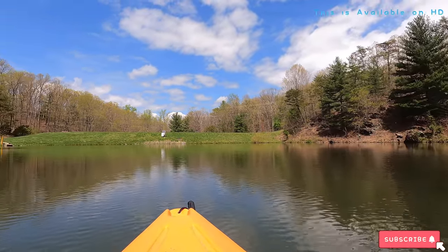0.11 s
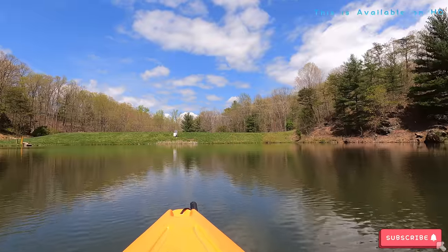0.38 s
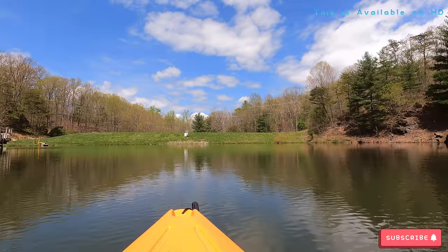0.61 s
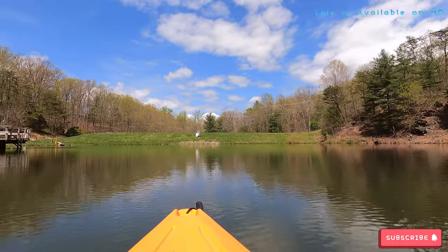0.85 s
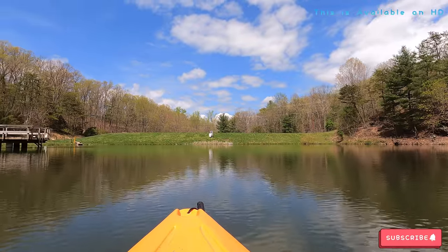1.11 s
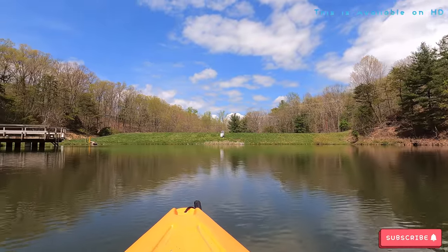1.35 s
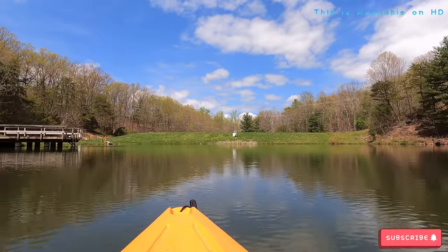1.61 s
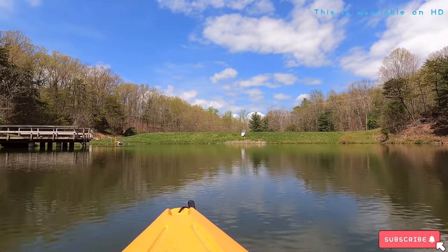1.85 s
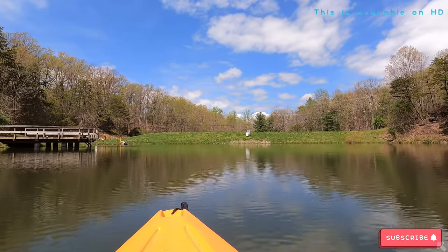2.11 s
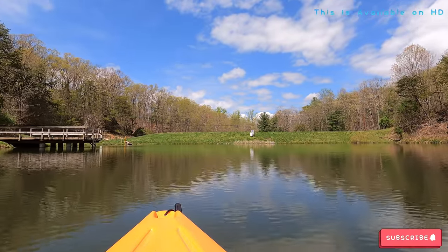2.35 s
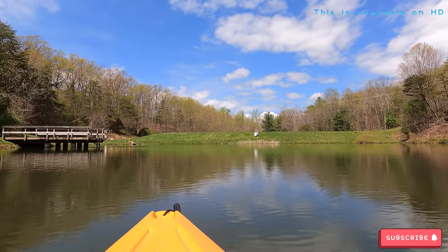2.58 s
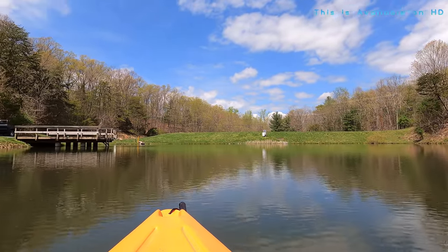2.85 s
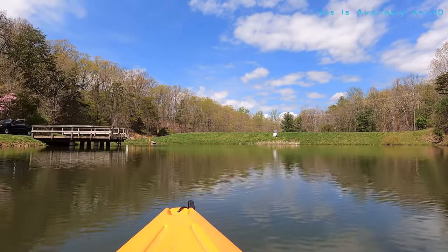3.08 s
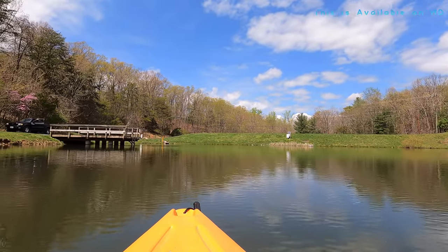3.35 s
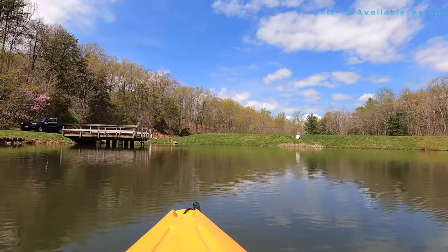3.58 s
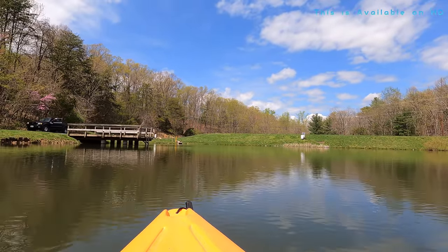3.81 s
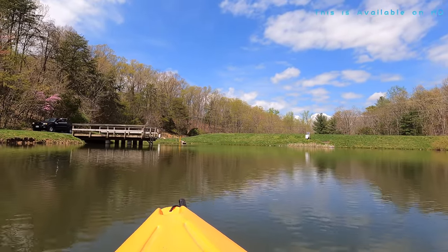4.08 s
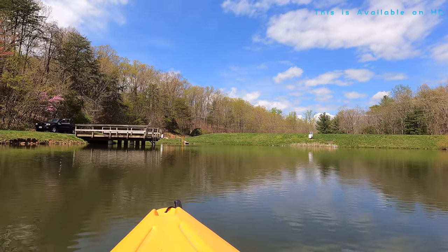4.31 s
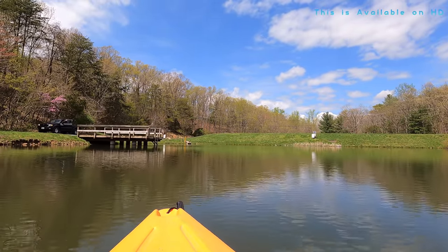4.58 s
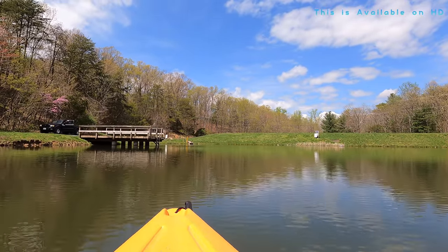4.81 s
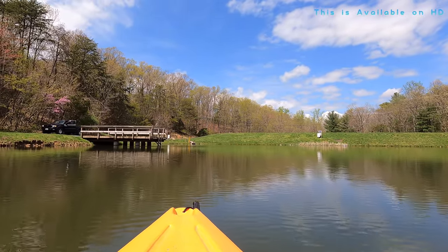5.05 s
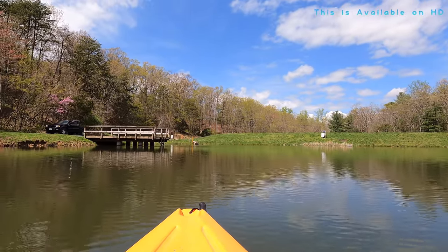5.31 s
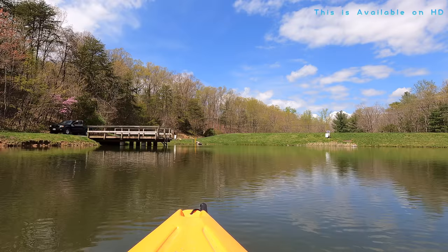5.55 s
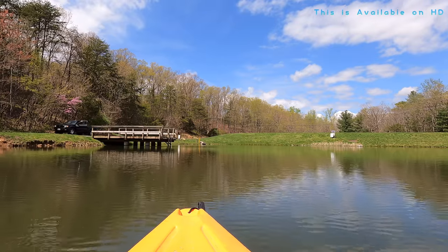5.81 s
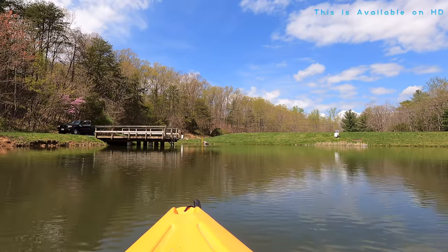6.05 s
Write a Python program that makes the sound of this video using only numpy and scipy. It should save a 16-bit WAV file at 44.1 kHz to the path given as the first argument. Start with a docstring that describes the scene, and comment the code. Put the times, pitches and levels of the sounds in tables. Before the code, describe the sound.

A paddle slaps, plunges and drags through calm lake water beside a kayak, with drips, gurgling bubbles and low buffeting wind.

```python
"""A paddle works beside a kayak on a calm lake, in light wind over the far hush of a shore.
First drips and low wind thumps, then slaps and churning water as the blade plunges and drags;
later the splashing leans left, and further slaps come with a stronger buffet of wind near the end.
Bubbles, thumps and cavities are damped gliding sines, droplets puffs of noise and tone;
wind, spray and shore are shaped stereo noise."""
import sys
import numpy as np
from scipy import signal
from scipy.fft import rfft, irfft, next_fast_len
from scipy.io import wavfile
from scipy.ndimage import map_coordinates

SR = 44100
rng = np.random.default_rng(int(sys.argv[2]) if len(sys.argv) > 2 else 0)


def transcribe(u):
    """Save the signal u as a 16-bit wav file named by the first command-line argument.

    u: samples, shape (n,) or (channels, n), limited to [-1, 1]; the rate is SR.
    q: integer samples, one column per channel.
    """
    v = np.clip(np.atleast_2d(u).T, -1, 1)
    q = np.round(v * 32767).astype(np.int16)
    wavfile.write(sys.argv[1], SR, q)


def magnitude_from_level(level_db):
    """Linear magnitude for a level in decibels (20 dB per decade)."""
    exponent = np.asarray(level_db, float) / 20
    return 10 ** exponent


N = 272097

# stirred water: time_s, gurgle_db, spray_db
STROKE = [(0.0, -47, -74), (0.1, -59, -74), (0.76, -59, -81), (1.29, -56.5, -86), (1.38, -47.5, -79),
          (1.54, -53.5, -81), (1.68, -39.5, -69), (1.95, -48.5, -70.5), (2.14, -46, -67.5),
          (2.45, -52, -75.5), (2.6, -56, -79), (2.83, -44.5, -67.5), (2.97, -51, -69), (3.28, -52.5, -73.5),
          (3.43, -52, -63.5), (3.63, -53, -85.5), (3.7, -38, -66), (3.87, -45, -73), (4.03, -43.5, -66),
          (4.18, -49, -68.5), (4.4, -44, -58), (4.48, -54.5, -83), (4.6, -39, -68), (4.77, -38.5, -62),
          (4.88, -46.5, -77), (4.96, -36, -59.5), (5.12, -41.5, -73), (5.4, -51.5, -68.5), (5.49, -44, -65),
          (5.62, -51.5, -68.5), (5.77, -49, -68), (5.94, -38, -71.5), (6.17, -51.5, -74)]
# drops and slaps on the surface: start_s, level_db, pitch_hz, length_s, left_over_right_db
IMPACTS = [(0.3475, -28, 5760, 0.0015, -2), (0.45, -26, 5080, 0.0018, -4), (1.036, -31, 3030, 0.0029, -1),
           (1.3339, -26.5, 1280, 0.0023, -2), (1.337, -31.5, 600, 0.0055, -1),
           (1.3432, -24.5, 1810, 0.0076, 2), (1.366, -30, 1230, 0.0045, 2), (1.6972, -24, 3480, 0.001, 1),
           (2.674, -40.5, 2980, 0.02, 28), (2.751, -42, 1710, 0.0078, -4), (2.819, -23, 2980, 0.00069, 21),
           (2.913, -39, 1940, 0.011, 6), (3.344, -29.5, 3870, 0.0017, -6), (3.3542, -27, 4360, 0.0013, -6),
           (3.3755, -15, 2880, 0.00043, -6), (3.4076, -30.5, 3870, 0.0029, -4),
           (3.4314, -22.5, 1245, 0.0038, -4), (3.4316, -27.5, 3550, 0.0039, -0.5),
           (3.444, -26, 1785, 0.0045, 1), (3.4536, -22.5, 2120, 0.0042, -6),
           (3.6662, -10.5, 1290, 0.0027, -1.5), (3.6665, -23.5, 3430, 0.0017, -5),
           (4.2054, -26.5, 2650, 0.0024, 0), (4.241, -31, 3420, 0.0061, 20),
           (4.2543, -24, 3140, 0.0034, 19), (4.3471, -24.5, 2000, 0.0016, 20),
           (4.3671, -13, 2830, 0.0011, 16), (4.5508, -20, 1330, 0.0051, 21.5), (4.551, -20, 630, 0.0039, 7),
           (4.5947, -31.5, 5540, 0.0029, 3), (4.6546, -19, 2900, 0.0015, 28),
           (4.6549, -32.5, 3700, 0.0087, 27.5), (4.681, -31.5, 1480, 0.0069, 31),
           (4.7283, -27, 2040, 0.0034, 31), (4.7582, -21, 2050, 0.0029, 32),
           (4.932, -30.5, 2490, 0.0032, 36), (4.9595, -24.5, 1980, 0.004, 30),
           (5.4215, -26, 2200, 0.0041, 15), (5.441, -27, 4860, 0.0014, -19),
           (5.4718, -13.5, 1950, 0.0012, -5.5), (5.474, -19, 990, 0.002, -3),
           (5.4755, -21, 1300, 0.0023, -4), (5.5172, -12.5, 1800, 0.00053, -4),
           (5.5207, -28, 2450, 0.0045, 6.5), (5.675, -18.5, 1330, 0.0025, -5.5),
           (5.6768, -31.5, 1630, 0.012, -5), (5.9154, -25, 445, 0.01, -5)]
# spray spectrum: freq_hz, relative_db
SPRAY_SPECTRUM = [(1200, -38), (2500, 3), (3600, 0.5), (5100, 1.5), (6400, -3), (7600, -5.5), (9800, -15),
                  (12100, -15), (15900, -44)]
# microphone response to the water: freq_hz, gain_db
MIC_RESPONSE = [(200, 3.5), (820, -7), (1150, -4.5), (2200, -3), (4900, 0.5), (6500, -6.5), (9500, -7.5),
                (12000, -8), (16000, -12)]


def unit(x):
    """Scale to rms 1."""
    return x / np.sqrt(np.mean(x ** 2) + 1e-20)


def along(points, hz):
    """Interpolate (Hz, value) points on a log frequency axis."""
    point_hz, value = np.transpose(points)
    return np.interp(np.log(hz + 1), np.log(point_hz + 1), value)


def curves(rows):
    """One value per sample for each column after the time."""
    time_s, *columns = np.transpose(rows)
    return [np.interp(np.arange(N) / SR, time_s, column) for column in columns]


def wobble(knots_per_s):
    """A smooth random curve through normal knots."""
    knots = rng.standard_normal(int(N * knots_per_s / SR) + 4)
    return map_coordinates(knots, [np.arange(N) * knots_per_s / SR])


def filtered(x, response):
    """Apply a complex response, a function of frequency in Hz."""
    size = next_fast_len(N + 8192)
    return irfft(rfft(x, size) * response(np.fft.rfftfreq(size, 1 / SR)), size)[..., :N]


def sides(pan_db):
    """Left and right gains of mean power 1; positive leans left."""
    return np.sqrt(2 / (1 + magnitude_from_level([-2 * pan_db, 2 * pan_db])))


def side(time_s):
    """Left-right dB of the stirred water."""
    # time_s, left_over_right_db
    side_rows = [(0.7, 1), (0.92, -5.5), (1.25, -3), (1.34, 0), (1.9, 0), (2.4, 6), (2.83, 8), (3.12, 5),
                 (3.25, -3.5), (3.87, -1), (4.36, 4), (4.6, 9), (5.27, 14), (5.45, 2.5), (5.75, -1)]
    return np.interp(time_s, *np.transpose(side_rows))


def rush(spectrum, alike, lead=((1, 0),), tilt=((1, 0),)):
    """Stereo noise of rms 1, partly alike and phase-shifted between the ports."""
    def ports(hz):
        turn = np.exp(.5j * along(lead, hz))
        return magnitude_from_level(along(spectrum, hz)) * sides(along(tilt, hz)) * [turn, turn.conj()]

    def share(hz):
        return np.clip(along(alike, hz), 0, 1)

    common, *own = rng.standard_normal((3, N))
    shared = filtered(common, lambda hz: np.sqrt(share(hz)) * ports(hz))
    separate = filtered(np.array(own), lambda hz: np.sqrt(1 - share(hz)) * ports(hz))
    return unit(shared + separate)


def rings(start_s, level_db, hz, end_hz, length_s, pan_db, fade, attack_s):
    """Damped gliding sines; the left port lags more the more a sound lies left, up to a limit."""
    # a rising pitch glides fastest at the end, as the bubble nears the surface; a falling one from the start
    rise_bend, fall_bend = 2.98, 0.933
    out = np.zeros((2, N + SR))
    left_lag_s = np.clip(30e-6 + 9e-6 * pan_db, 0, 180e-6)
    # sounds of similar length are computed together
    size_log2 = np.ceil(np.log2(length_s * SR)).astype(int)
    for k in np.unique(size_log2):
        g = size_log2 == k
        samples = np.arange(2 ** k + 16)
        at = np.round(start_s[g, None] * SR).astype(int) + samples
        bend = np.where(end_hz > hz, rise_bend, fall_bend)[g, None]
        for ch, gain in enumerate(sides(pan_db[g])):
            t = np.maximum(samples / SR - left_lag_s[g, None] * (1 - ch), 0)
            life = np.minimum(t / length_s[g, None], 1)
            turns = t * (hz[g, None] + (end_hz - hz)[g, None] * life ** bend / (bend + 1))
            envelope = (1 - life) ** fade * (1 - np.exp(-t / attack_s))
            wave = envelope * np.sin(2 * np.pi * turns)
            scaled = wave * (gain * magnitude_from_level(level_db[g]))[:, None]
            out[ch] += np.bincount(at.ravel(), scaled.ravel(), N + SR)
    return out[:, :N]


def swarm(mid_hz, octaves, cycles, spread_db, rise, pan_db, stray_db, count):
    """Random small bubbles of rms 1: log-normal pitch, a few much louder than the rest."""
    at = rng.uniform(0, N - 1, count)
    pitch_draw, rise_draw, life_draw, pan_draw = rng.standard_normal((count, 4)).T
    hz = np.clip(mid_hz * 2 ** (octaves * pitch_draw), 300, 15000)
    end_hz = hz * (1 + rise * abs(rise_draw))
    level_db = spread_db * rng.exponential(1, count).clip(0, 4)
    pan = pan_db[at.astype(int)] + stray_db * pan_draw
    length_s = cycles * np.exp(.4 * life_draw.clip(-2, 2)) / hz
    return unit(rings(at / SR, level_db, hz, end_hz, length_s, pan, fade=0.36, attack_s=0.000069))


def churn():
    """Water stirred by the blade: separate gurgling bubbles over a wash of tiny ones and a fizz of spray."""
    (gurgle_db, spray_db), pan_db = curves(STROKE), side(np.arange(N) / SR)
    clump = wobble(45)
    gurgle = swarm(1750, .75, 6, 4.5, .2, pan_db, 4, count=4200)
    wash = swarm(1717, 0.91, 3.23, 3.2, 0.05, pan_db, 10.6, count=9000)
    fizz = swarm(4670, 0.78, 4.3, 3.15, 0.07, pan_db, 8.4, count=6000)
    blips = swarm(1400, .65, 10, 3, .1, pan_db, 4, count=900)
    hiss = rush(SPRAY_SPECTRUM, [(3000, 1.0), (12000, 0.4)]) * sides(pan_db)
    # spray on the open left side reaches the port with its finest treble
    air = rush([(7000, -60), (10500, -15), (12200, -4), (15800, -17)], [(1, .4)], tilt=[(1, 22)])

    stirred = magnitude_from_level(-2) * gurgle + magnitude_from_level(-5.5 + 2.5 * clump) * wash + magnitude_from_level(-4) * blips
    water = magnitude_from_level(gurgle_db) * stirred + magnitude_from_level(spray_db + 8.5 + 5.3 * clump) * fizz
    spray = magnitude_from_level(spray_db + 3.5 + 4.0 * clump) * hiss
    spray = spray + magnitude_from_level(spray_db - 18.5 + 1.28 * pan_db + 4.2 * clump) * air
    return filtered(water, lambda hz: magnitude_from_level(along(MIC_RESPONSE, hz))) + spray


def bubbles_and_thumps():
    """Larger air bubbles ring one by one, unsteadily; the low rows from 0.9 to 1.24 s are thumps of wind."""
    # start_s, level_db, start_hz, end_hz, length_s
    ring_rows = [(0.008, -37.5, 1054, 1730, 0.028), (0.916, -26, 270, 554, 0.012),
                 (1.024, -26, 334, 407, 0.0085), (1.07, -32, 462, 450, 0.022),
                 (1.161, -35, 300, 383, 0.012), (1.198, -37, 260, 330, 0.014),
                 (1.235, -33, 326, 420, 0.011), (1.379, -36.5, 678, 660, 0.026),
                 (1.409, -42.5, 624, 524, 0.028), (1.469, -41, 1106, 900, 0.026),
                 (1.639, -37.5, 1015, 1300, 0.028), (1.689, -34.5, 1036, 1170, 0.019),
                 (1.755, -38, 1110, 1250, 0.016), (1.802, -37, 1500, 1550, 0.014),
                 (1.83, -40, 910, 910, 0.038), (1.872, -43.5, 830, 1020, 0.039),
                 (1.972, -34.5, 1210, 3860, 0.013), (2.114, -39, 581, 680, 0.03),
                 (2.193, -33, 465, 520, 0.029), (2.385, -36, 490, 473, 0.0084),
                 (2.446, -32.5, 617, 546, 0.014), (2.447, -30.5, 960, 1640, 0.027),
                 (3.044, -36.5, 2170, 4750, 0.013), (3.114, -42.5, 954, 660, 0.026),
                 (3.6705, -25, 1150, 1030, 0.014), (3.672, -41, 756, 438, 0.037),
                 (3.699, -30.5, 514, 1310, 0.032), (3.738, -41, 583, 640, 0.03),
                 (3.7626, -32, 1310, 1600, 0.0092), (3.766, -37.5, 798, 1500, 0.027),
                 (3.981, -38.5, 952, 2100, 0.04), (4.346, -39.5, 728, 1370, 0.036),
                 (4.556, -28.5, 715, 248, 0.039), (4.592, -34, 335, 460, 0.025),
                 (4.778, -33, 1048, 1710, 0.032), (5.0406, -33.5, 2190, 2680, 0.021),
                 (5.5144, -31, 1050, 850, 0.017), (5.676, -32.5, 670, 640, 0.02),
                 (5.694, -24.5, 1210, 860, 0.016), (5.711, -30, 940, 670, 0.018),
                 (5.9205, -30, 1590, 1590, 0.012)]
    quaver_db, quavers_per_s = 1.5, 130  # the water around shakes the bubbles
    columns = np.transpose(ring_rows)
    ring = rings(*columns, side(columns[0]), fade=0.68, attack_s=0.00014)
    return ring * magnitude_from_level(quaver_db * wobble(quavers_per_s))


def impacts():
    """Each drop or slap opens a cavity ringing in a few sagging modes; so small a source radiates little bass."""
    # cavity modes: pitch_ratio, level_db
    cavity_modes = [(1.002, 1), (1.5, -19.5), (2.6, -26.5)]
    end_over_start_pitch, bass_cut_hz = 0.89, 350
    start_s, level_db, hz, length_s, pan_db = np.transpose(IMPACTS)
    ring = 0
    for ratio, mode_db in cavity_modes:
        mode_hz = ratio * hz
        ring = ring + rings(start_s, level_db + mode_db, mode_hz, mode_hz * end_over_start_pitch,
                            length_s, pan_db, fade=0.55, attack_s=0.0001)
    return filtered(ring, lambda hz: (1j * hz / (bass_cut_hz + 1j * hz)) ** 2)


def splash():
    """Every impact throws a ragged burst of tiny bubbles that dies within a few hundredths of a second."""
    decay_60db_s = 0.068
    start_s, level_db, _, length_s, pan_db = np.transpose(IMPACTS)
    # powers add, then the root gives the envelope
    power = np.bincount(np.round(start_s * SR).astype(int), magnitude_from_level(2 * level_db) * length_s / .003, N)
    power_decay = magnitude_from_level(-2 * 60 * np.arange(SR // 5) / SR / decay_60db_s)
    throw = np.sqrt(np.abs(signal.fftconvolve(power, power_decay)[:N]))
    pan_curve_db = np.interp(np.arange(N) / SR, start_s, pan_db)
    spatter = swarm(1740, 0.866, 7.4, 0.88, .2, pan_curve_db, 4.7, count=9000)
    return magnitude_from_level(-15) * throw * filtered(spatter, lambda hz: magnitude_from_level(along(MIC_RESPONSE, hz)))


def ticks():
    """Droplets burst as short puffs of noise and tone; many faint ones fall at random in the spray."""
    # start_s, level_db, pitch_hz
    tick_rows = [(0.2036, -35, 5330), (0.397, -40.5, 5900), (1.3798, -41.5, 6800), (1.456, -40, 4740),
                 (1.6332, -33.5, 5560), (2.15, -38, 5170), (2.2, -36, 4630), (2.2577, -41, 6940),
                 (2.526, -40, 5000), (3.095, -35.5, 7500), (3.213, -37, 4270), (3.3592, -28, 4720),
                 (3.495, -38, 4600), (3.704, -32, 4500), (3.743, -35, 4860), (3.807, -39.5, 4440),
                 (4.0587, -35.5, 4750), (4.285, -37, 6520), (4.375, -27.5, 7400), (4.4136, -33.5, 4370),
                 (5.3394, -35.5, 8100), (5.442, -30, 4920), (5.4652, -28.5, 4700), (5.522, -31, 5100),
                 (5.737, -34.5, 6340)]
    faint_count, puff_samples, decay_60db_s, bass_cut_hz = 450, 256, 0.014, 3000
    _, spray_db = curves(STROKE)
    when, loudness, pitch, stray = rng.uniform(0, 1, (faint_count, 4)).T
    k = (when * (N - 1)).astype(int)
    faint_db = spray_db[k] + 14 - 5 * np.log(1 - .97 * loudness)
    faint = [k / SR, faint_db, 4000 * 2 ** (1.77 * pitch), 10 * (stray - .5)]
    listed = np.pad(np.transpose(tick_rows), ((0, 1), (0, 0)))  # no stray pan
    start_s, level_db, hz, stray_db = np.hstack([listed, faint])
    pan_db = side(start_s) + stray_db

    t = np.arange(puff_samples) / SR
    noise = rng.standard_normal((len(start_s), 3, puff_samples))
    # each port hears a slightly different burst
    noise = 0.9 * noise[:, 0] + 0.96 * noise[:, 1:].transpose(1, 0, 2)
    tone = 1.03 * np.sin(2 * np.pi * hz[:, None] * t)
    puffs = (noise + tone) * magnitude_from_level(-60 * t / decay_60db_s)
    at = np.round(start_s * SR).astype(int)[:, None] + np.arange(puff_samples)
    out = []
    for puff, gain in zip(puffs, sides(pan_db)):
        scaled = puff * (gain * magnitude_from_level(level_db))[:, None]
        out.append(np.bincount(at.ravel(), scaled.ravel(), N + puff_samples))

    def response(hz):
        return magnitude_from_level(along(SPRAY_SPECTRUM, hz)) * (1j * hz / (bass_cut_hz + 1j * hz)) ** 2
    return filtered(np.array(out), response)


def wind():
    """Slow buffeting differs from port to port; the flutter and rattle above it come in lumps shared by both."""
    # time_s, buffet_db, flutter_db
    wind_rows = [(0.0, -38.5, -49.5), (0.3, -32.5, -48), (0.4, -33.5, -49), (0.76, -35.5, -49),
                 (0.86, -26, -45), (0.99, -27, -37.5), (1.24, -27, -38.5), (1.35, -31.5, -46.5),
                 (1.48, -26, -40), (1.6, -39.5, -49), (1.81, -21, -42.5), (1.93, -33, -51),
                 (2.06, -31.5, -41), (2.26, -23.5, -42.5), (2.42, -41.5, -53), (2.58, -29.5, -38),
                 (2.9, -31, -35), (3.01, -37, -51.5), (3.1, -30.5, -41), (3.24, -38, -48.5),
                 (3.53, -42, -50), (3.96, -33, -53.5), (4.29, -37.5, -57), (4.51, -30.5, -46),
                 (4.62, -33.5, -46.5), (4.89, -31.5, -46.5), (5.08, -28, -35.5), (5.2, -39.5, -43),
                 (5.39, -33.5, -41), (5.78, -30, -39.5), (5.85, -20.5, -37), (5.93, -23, -28.5),
                 (6.17, -27, -41)]
    # spectra: freq_hz, relative_db
    buffet_spectrum = [(12, -25), (24, 7.5), (36, 5), (60, 2.5), (90, -1.5), (130, -10), (200, -38),
                       (500, -120)]
    flutter_spectrum = [(40, -104), (70, -84), (120, -9.5), (170, -0.5), (250, -9), (400, -15.5),
                        (650, -37.5), (1200, -55), (4000, -120)]
    rattle_spectrum = [(200, -60), (330, -4), (480, -3.5), (700, -3.5), (1200, -40), (3000, -120)]
    # likeness of the ports: freq_hz, likeness_0_to_1
    port_likeness = [(35, .38), (65, .5), (100, .45), (160, .9), (250, .95), (500, .8)]
    # freq_hz, left_lead_rad
    port_lead = [(35, .3), (65, .5), (105, .1), (140, -1.45), (400, -1.4), (600, -1.1)]
    # freq_hz, left_over_right_db
    port_tilt = [(35, -4.5), (65, 1.1), (100, 7), (150, -1.3), (250, -4.1), (400, -5)]
    ports = port_likeness, port_lead, port_tilt
    gusty_db, gusts_per_s = 1, 7

    buffet_db, flutter_db = curves(wind_rows)
    rattle_db = -47 + 1.7 * (flutter_db + 31.5)  # grows faster than the flutter
    lumps, gusts_db = wobble(30), gusty_db * wobble(gusts_per_s)
    port_wobble = np.array([wobble(14), wobble(15)])
    buffet = magnitude_from_level(gusts_db + 1.46 * lumps + 0.69 * port_wobble) * rush(buffet_spectrum, *ports)
    flutter = magnitude_from_level(gusts_db + 2.2 * lumps) * rush(flutter_spectrum, *ports)
    rattle = magnitude_from_level(gusts_db + 2.6 * lumps) * rush(rattle_spectrum, *ports)
    return magnitude_from_level(buffet_db) * unit(buffet) + magnitude_from_level(flutter_db) * unit(flutter) + magnitude_from_level(rattle_db) * unit(rattle)


def shore():
    """Far leaves and ripples: a smooth hush of noise."""
    # freq_hz, relative_db
    shore_spectrum = [(290, -7), (500, 1), (806, -8.5), (1020, -2), (2070, -12.5), (3740, -14),
                      (4320, -10.5), (5940, -20.5), (10500, -47.5), (12100, -42), (15900, -64)]
    likeness = [(600, 0.93), (3000, 0.6), (7000, 0.79), (15000, 0.35)]
    return magnitude_from_level(-57 + 0.2 * wobble(8.3)) * rush(shore_spectrum, likeness)


def scene():
    """Water near the hull, wind and shore."""
    return churn() + bubbles_and_thumps() + impacts() + splash() + ticks() + wind() + shore()


def band_limit(x):
    """A steep low-pass at the top of the band."""
    return signal.sosfilt(signal.butter(12, 16060, fs=SR, output="sos"), x)


def record(dry):
    """Deliver the finished mix."""
    return band_limit(dry)


dry = scene()
out = record(dry)
transcribe(out)
```